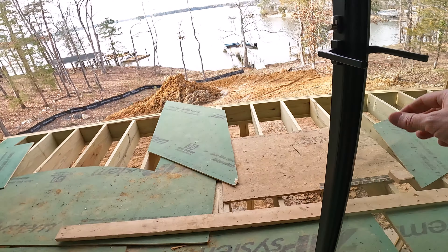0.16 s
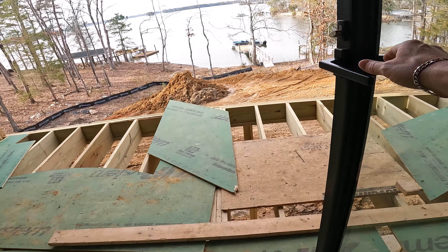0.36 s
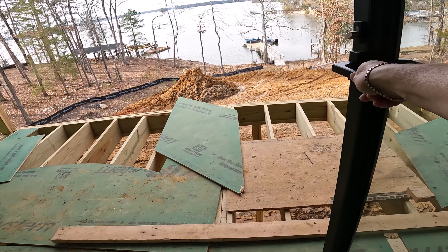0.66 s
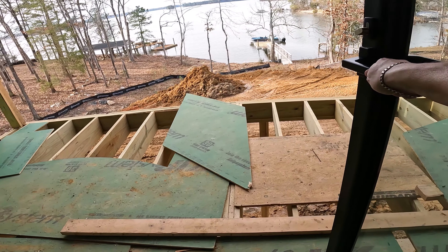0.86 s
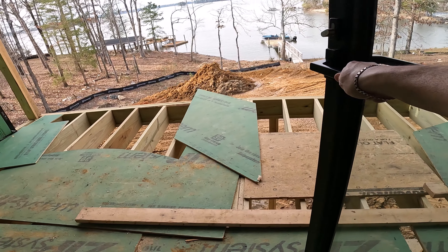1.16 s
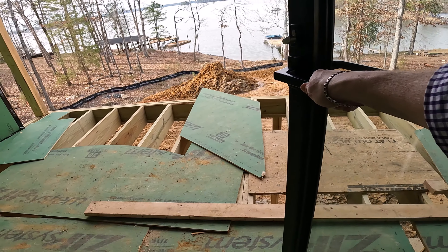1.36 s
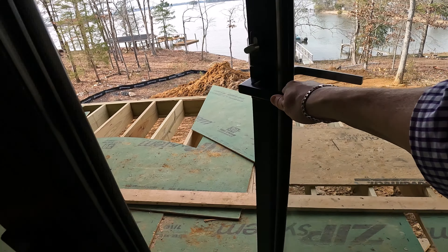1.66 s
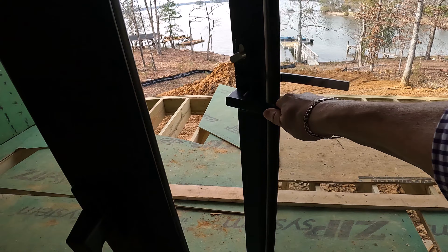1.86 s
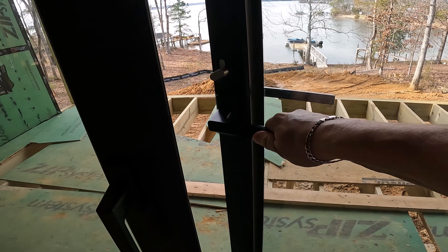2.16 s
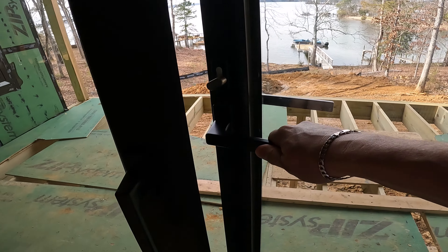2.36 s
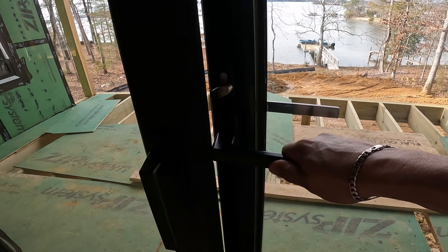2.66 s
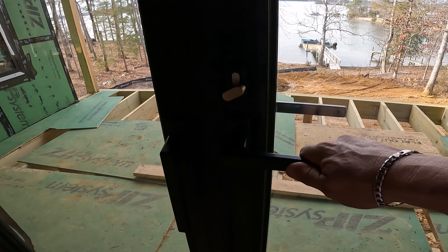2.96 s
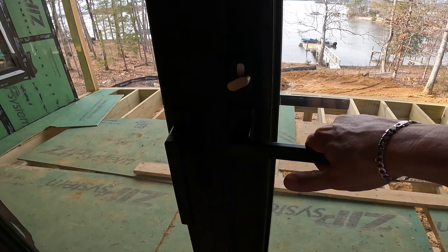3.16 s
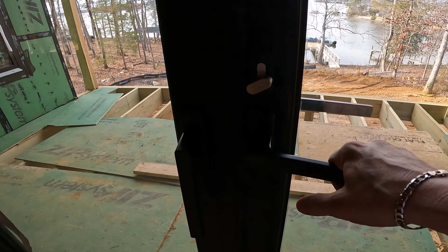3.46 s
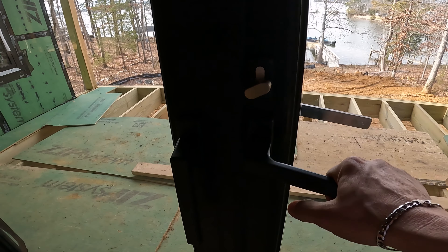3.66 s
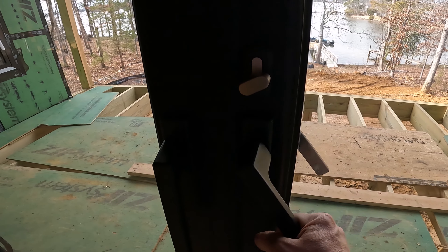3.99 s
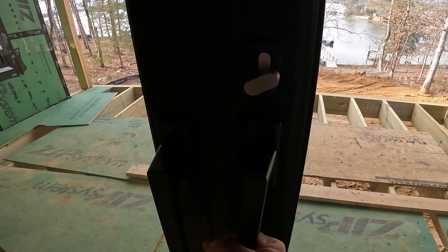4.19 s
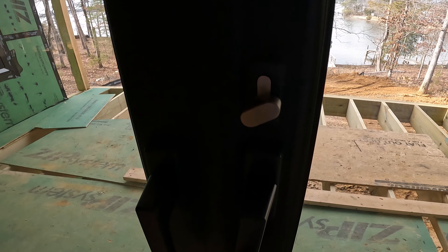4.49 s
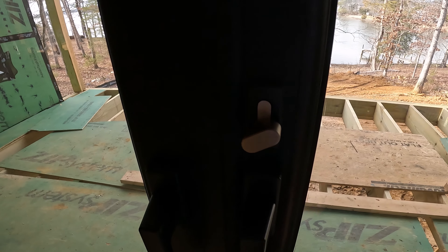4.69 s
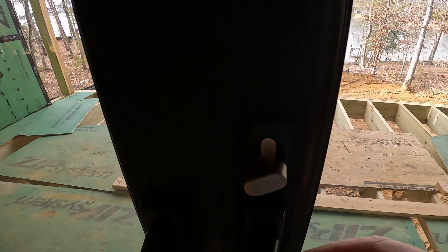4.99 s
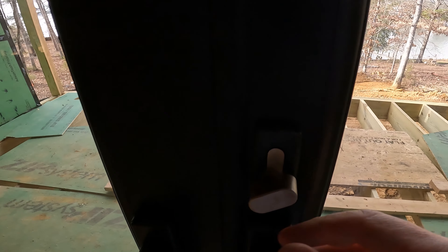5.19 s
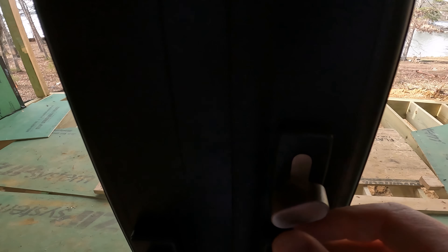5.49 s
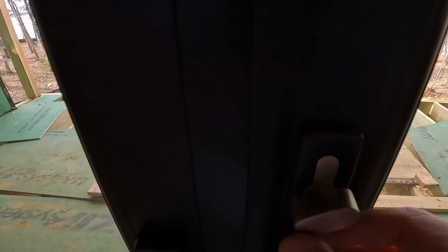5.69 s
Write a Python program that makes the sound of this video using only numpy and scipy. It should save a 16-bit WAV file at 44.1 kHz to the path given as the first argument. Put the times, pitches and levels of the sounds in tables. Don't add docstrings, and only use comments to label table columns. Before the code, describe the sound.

Close view of a door's metal lever and bolt in an unfinished timber building. A soft thump and small ticks sit over a distant engine drone; a latch clacks and slides, the engine fades, then a dense burst of metal blows and panel thuds erupts around three seconds. Groans, a bright spring snap and settling ticks follow over a low hum. Close stereo microphone, short woody reverberation, wind rumble.

```python
import sys
import numpy as np
from scipy import signal
from scipy.io import wavfile
from scipy.ndimage import uniform_filter1d

SR = 44100
rng = np.random.default_rng(int(sys.argv[2]) if len(sys.argv) > 2 else 0)


def unload_audio(sound):
    columns = np.transpose(np.atleast_2d(sound))
    steps = np.round(np.clip(columns, -1, 1) * 32767)
    wavfile.write(sys.argv[1], SR, steps.astype(np.int16))


def undo_db(level):
    steps = np.asarray(level, float) / 20
    return 10 ** steps


N = 257544
T = np.arange(N) / SR


def evened(x):
    return x / np.sqrt(np.mean(x ** 2) + 1e-20)


def curve(rows, t=T):
    s, *columns = np.transpose(rows)
    return [np.interp(t, s, c) for c in columns]


def read(points, hz, column=1):
    table = np.transpose(points)
    return np.interp(np.log(hz + 1), np.log(table[0] + 1), table[column])


def add(mix, s, sound):
    part = mix[..., round(s * SR):][..., :sound.shape[-1]]
    part += sound[..., :part.shape[-1]]


def resonate(x, hz, width):
    r = np.exp(-np.pi * width / SR)
    if np.ndim(hz) == 0:
        return 2 * signal.lfilter([1 - r], [1, -r * np.exp(2j * np.pi * hz / SR)], x).real
    turn = np.exp(2j * np.pi * np.cumsum(hz) / SR)
    return 2 * (turn * signal.lfilter([1 - r], [1, -r], x / turn)).real


def through(x, modes):
    out = 0
    for k, (hz, width, db) in enumerate(modes):
        mode = resonate(resonate(x, hz, width), hz, width) / np.sqrt(width)
        out = out + (-1) ** k * undo_db(db) * mode
    return out


def band(x, lo_hz, hi_hz):
    return signal.sosfilt(signal.butter(2, [lo_hz, hi_hz], "band", fs=SR, output="sos"), x)


def panned(x, pan_db):
    return x * undo_db([[pan_db / 2], [-pan_db / 2]])


# (frequency [Hz], level [dB], t60 [s])
LOCK_MODES = [(1790, -31, 0.12), (2770, -2.5, 0.38), (3540, -12, 0.14), (4170, -2, 0.25), (6640, -14, 0.14)]
# (frequency [Hz], width [Hz], level [dB])
METAL_TREBLE = [(4800, 6500, 2.5), (7000, 5940, 3), (11000, 3850, -8)]


def strikes(table, usual_t60, pan_db):
    usual_db, rattle_per_db = -31, 0.5043
    crack_share, ring_outlasts = 0.54, 1.8
    out, t = np.zeros((2, N)), np.arange(6000) / SR
    for s, db, hz, treble_db in table:
        t60 = usual_t60 * undo_db(rattle_per_db * (db - usual_db))
        bounces = undo_db(1.9 * rng.standard_normal((2, len(t) // 50))).repeat(50, axis=1)
        blow = 1.85 * undo_db(-60 * t / 0.0089)
        fade_s = np.maximum(t60 * np.array([[1], [crack_share]]), .004)
        rattle = (blow + bounces * undo_db(-60 * t / fade_s)) * np.minimum(t / 0.0011, 1)
        grain = rng.standard_normal((2, len(t))) * rattle
        centre = through(grain[0], [(0.557 * hz, 0.23 * hz, -9),
                                    (hz, 0.41 * hz, 0),
                                    (1.81 * hz, 1.86 * hz, -6.0 + 0.31 * treble_db)])
        crack = through(grain[1], METAL_TREBLE)
        ring = 0
        for mode_hz, mode_db, mode_t60 in LOCK_MODES:
            if mode_hz > 3600:
                mode_db = mode_db + treble_db
            else:
                mode_db = mode_db - 2.8 * abs(np.log2(mode_hz / hz))
            fade = undo_db(mode_db - 60 * t / min(mode_t60, ring_outlasts * t60))
            ring = ring + fade * np.sin(2 * np.pi * (0.9 * mode_hz * t + 0.1))
        hit = centre / abs(centre).max() + undo_db(1.28 * treble_db) * crack / abs(crack).max()
        hit = hit + undo_db(-24.0) * ring
        add(out, s - .0004, panned(undo_db(db - 3.0) * hit, pan_db))
    return out


# (time [s], peak level [dB], centre [Hz], relative treble above 4 kHz [dB])
CASE_STRIKES = [(.156, -39, 700, -8), (.189, -39, 1140, 1), (1.678, -20.5, 1840, -3),
                (1.770, -22.5, 2540, -2), (2.741, -37, 1160, -29), (2.941, -28.5, 1540, -12),
                (2.965, -29, 1520, -12), (2.994, -18.5, 980, -6.5), (3.026, -19.5, 1310, -13.5),
                (3.048, -13.5, 1446, 4.5), (3.121, -14.5, 960, -8.5), (3.155, -13, 1750, 5),
                (3.363, -21.5, 1500, -20.5), (3.3958, -14, 1530, 2), (3.409, -22.5, 1510, -16.5),
                (3.578, -35, 1270, -18), (3.613, -26, 1480, -17), (3.669, -25, 1400, -27),
                (3.68, -29, 1230, -14), (3.72, -32, 990, -1.5), (3.8, -36, 1390, -10),
                (3.877, -36, 1720, -6), (4.24, -27.5, 2650, 5.5)]
# (time [s], peak level [dB], centre [Hz], relative treble [dB])
EDGE_STRIKES = [(1.051, -49, 1160, -7), (1.732, -14, 2170, -1.5), (2.729, -28.5, 1730, -21.5),
                (2.891, -19.5, 1470, -13.5), (2.9825, -16.5, 2270, -7), (3.527, -21.5, 2060, -14.5),
                (3.781, -33, 1070, -6), (3.851, -37, 2380, -2.5), (3.924, -37, 1160, -8),
                (4.012, -35.5, 890, -18), (4.15, -38.5, 2610, 5), (4.177, -28, 2000, -18.5),
                (4.268, -22, 3770, -5.5), (4.283, -28, 1450, -16.5), (4.309, -31, 1320, -40)]


def lock_and_bolt():
    return strikes(CASE_STRIKES, 0.038, 1) + strikes(EDGE_STRIKES, 0.019, -1.5)


# (time [s], peak level [dB], frequency [Hz],
# t60 [s])
MODE_RINGS = [(2.9828, -11.5, 2250, 0.0061), (3.0, -40, 434, .05), (3.028, -23, 934, 0.054),
              (3.027, -22.5, 400, 0.035), (3.035, -31, 900, 0.057), (3.048, -23, 1563, 0.075),
              (3.049, -22, 1020, 0.04), (3.068, -25, 1110, 0.044), (3.076, -26, 940, 0.055),
              (3.093, -35, 1000, .05), (3.12, -31.5, 962, 0.15), (3.12, -25, 505, 0.094),
              (3.156, -25.5, 1870, 0.045), (3.159, -46, 2770, 0.14), (3.174, -28, 1500, .03),
              (3.184, -31, 986, .07), (3.21, -42, 1090, 0.09), (3.246, -30.5, 640, 0.09),
              (3.259, -39, 1020, 0.032), (3.526, -32.5, 1366, 0.034), (3.578, -37.5, 456, 0.044),
              (3.612, -33, 1380, 0.037), (3.622, -32.5, 2060, 0.024), (3.628, -45, 1500, 0.021),
              (3.676, -34, 2120, 0.035), (3.68, -42, 6600, .006), (3.69, -38, 900, 0.052),
              (3.746, -45, 1740, 0.045), (1.678, -29, 3700, .012), (3.791, -41, 1130, 0.025),
              (3.858, -45, 1320, 0.048), (3.891, -43.5, 1000, 0.04), (4.598, -56, 2000, 0.035),
              (4.622, -53, 1510, .04), (4.642, -46, 2280, 0.047), (4.684, -47, 1350, 0.035),
              (4.74, -41, 3140, 0.022), (4.758, -44, 3300, 0.028), (4.789, -48, 2830, 0.027),
              (4.825, -51, 3330, 0.026),
              (.0665, -22, 245, 0.025), (.072, -34, 100, 0.39), (0.17, -43, 1330, 0.024),
               (.189, -39, 1250, 0.024), (0.22, -48, 1150, 0.021), (3.0, -24, 180, 0.12),
               (3.068, -29, 332, 0.13), (3.102, -25, 250, 0.07), (3.127, -37, 740, .04),
               (3.155, -27, 808, 0.061), (3.157, -33, 625, .05), (3.15, -24.5, 320, .06),
               (3.185, -30, 325, 0.053), (3.156, -20, 7000, 0.018), (3.18, -37, 4980, 0.067),
               (3.207, -37, 7200, .04), (3.36, -40, 1050, 0.031), (3.397, -25, 7100, 0.018),
               (3.41, -35, 3420, 0.092), (4.2395, -28, 6600, 0.014), (4.24, -34, 6550, .03),
               (4.284, -26, 233, 0.063), (4.308, -35, 333, 0.05), (1.731, -19, 1880, 0.023),
               (1.771, -26, 2170, 0.022), (3.672, -35, 526, .06), (3.8, -37, 457, 0.062),
               (4.24, -26, 12000, 0.015), (4.267, -27, 3920, 0.0088), (4.918, -27.5, 200, 0.038),
               (4.92, -41, 618, 0.087), (5.4, -45.5, 550, 0.099)]


def rings():
    out, t = np.zeros(N), np.arange(9000) / SR
    for s, db, hz, t60 in MODE_RINGS:
        rise = np.minimum(t / (.0002 + 0.37 / hz), 1)
        add(out, s, undo_db(db - 60 * t / t60) * rise * np.sin(2 * np.pi * hz * t))
    return out


# (time [s], peak level [dB], main ring [Hz], relative upper body [dB])
PANEL_KNOCKS = [(0.066, -37, 181.6, -14), (0.075, -23, 66.7, -23), (.912, -36.5, 60, -9.5),
                (1.055, -38.5, 134.5, -8), (1.729, -25.5, 64.4, -6), (1.979, -29, 112.7, -11),
                (2.728, -36, 58.7, -37), (2.891, -41, 70, 4.5), (2.996, -25, 154, 3.5),
                (3.047, -26.5, 65.4, 1), (3.117, -15.5, 62, -9), (3.16, -16, 61.8, -6.5),
                (3.201, -34, 62.4, -1), (3.251, -21.5, 62, -14), (3.357, -31.5, 143.7, 0.5),
                (3.4, -21, 100, -3.5), (3.527, -28.5, 70, -11.5), (3.664, -32.5, 119, 4.5),
                (3.796, -31, 95, -1), (4.01, -17, 63.5, -23), (4.18, -28.5, 122, -49.5),
                (4.282, -17, 70, -11.5), (4.308, -23.5, 134.6, -18), (4.672, -22.5, 140, -22),
                (4.918, -39.5, 185, 0), (5.386, -33, 138.3, -11.5)]
# (frequency [Hz], width [Hz], level [dB])
PANEL_BODY = [(220, 160, 1), (337.4, 220, 10), (420, 510, 3.5), (640, 980, -31.5)]


def knocks():
    out, t = np.zeros(N), np.arange(14000) / SR
    for s, db, hz, body_db in PANEL_KNOCKS:
        t60 = 0.17 * (101 / hz) ** 0.069
        shake = undo_db(-60 * t / 0.026) + 0.2 * undo_db(-60 * t / 0.32)
        blow = rng.standard_normal(len(t)) * shake * np.minimum(t / 0.0044, 1)
        fade = undo_db(-60 * t / t60) * np.minimum(t / 0.0024, 1)
        turns = hz * (t + 0.0057 * (1 - np.exp(-t / 0.003)))
        low = fade * (np.sin(2 * np.pi * turns) + .5 * np.sin(2 * np.pi * 1.453 * turns))
        body = through(blow, PANEL_BODY)
        add(out, s, undo_db(db - 5.0) * (low + undo_db(body_db + 3.5) * body / abs(body).max()))
    return out


# (start time [s], length [s], top level [dB], centre [Hz], relative treble [dB])
LOADING_RUBS = [
    (2.8, 0.2, -38, 1190, -19.5),
    (5.34, 0.0784, -40.5, 3170, -3.5),
]
# (start time [s], length [s], top level [dB], centre [Hz], relative treble [dB])
EVEN_RUBS = [
    (1.74, 0.14, -46.5, 2000, -4.5),
    (1.984, 0.062, -39, 2300, -1.5),
    (3.015, 0.061, -37.5, 943, -15),
    (3.4, 0.023, -39, 1490, -1.5),
    (4.92, 0.033, -38.5, 2450, -3.5),
    (5.365, 0.04, -56.5, 2740, 6.5),
]
# (start time [s], length [s], top level [dB], centre [Hz], relative treble [dB])
SETTLING_RUBS = [
    (1.885, 0.4, -52, 1820, -7),
    (3.09, 0.71, -40.5, 900, -10),
    (3.62, 0.87, -52, 1350, -52),
    (4.27, 0.086, -38, 1260, -6),
    (4.96, 0.47, -56, 2090, -4.5),
    (5.43, 0.22, -54.5, 2480, -6.5),
]
# (start time [s], length [s], top level [dB], centre [Hz], relative treble [dB])
BRUSHES = [
    (.13, 0.076, -59, 1160, 2),
    (.0, 0.8, -65, 1600, -8),
    (2.735, .13, -65, 1500, -12),
    (1.48, 0.31, -66.5, 1740, 0.5),
    (4.57, 0.22, -61, 2270, -0.5),
    (4.69, 0.18, -51, 3030, -1),
    (5.13, .12, -58, 1980, 1.5),
]
# (factor on centre [ratio], width factor [ratio], level [dB])
RUB_MODES = [(0.447, 0.87, -6), (1.002, 0.93, 1), (1.65, 0.6, -4)]
# (frequency [Hz], width [Hz], level [dB])
DOOR_MODES = [(426.4, 48, 10.5), (545, 40, 0.5), (662.4, 59, 4), (935, 70, 4), (1043, 70, 0.5),
              (1256, 130, 0), (1540, 190, -2.5), (1933, 120, -5), (2300, 300, -4)]


def rubs():
    touch_s, stop_s, speed_up = 0.0088, 0.01, 0.21
    unevenness_db = 2.3 * np.minimum(rng.exponential(1, (4, N // 90 + 1)), 5)
    slips = rng.standard_normal((4, N)) * undo_db(unevenness_db).repeat(90, axis=1)[:, :N]
    treble = evened(through(slips[3], METAL_TREBLE))
    bumps = rng.random((len(DOOR_MODES), N)) < 110 / SR
    bumps = bumps * undo_db(5.1 * np.clip(rng.standard_normal(N), -2, 2))
    door = np.array([through(bump, [mode]) for bump, mode in zip(bumps, DOOR_MODES)])
    out = np.zeros(N)
    # strokes, change of pressure over a stroke [dB], fade in and out [dB]
    kinds = [(LOADING_RUBS, 36, 0), (EVEN_RUBS, -0.5, 0), (SETTLING_RUBS, -25, 0), (BRUSHES, 0, 20.5)]
    strokes = [(*row, change_db, arch_db) for table, change_db, arch_db in kinds for row in table]
    for s, length, top_db, centre_hz, treble_db, change_db, arch_db in strokes:
        a, b = round(s * SR), round((s + length + stop_s) * SR)
        t = T[a:b]
        along = (t - s) / length
        loading = change_db > 0
        db = top_db + change_db * (along - loading) - arch_db * (2 * along - 1) ** 2
        hz = centre_hz * (1 + speed_up * (along - .5) * loading)
        body = 0
        for slip, (factor, width, mode_db) in zip(slips, RUB_MODES):
            body = body + through(slip[a:b], [(factor * hz, width * hz.mean(), mode_db)])
        near = undo_db(-9 * abs(np.log2(np.transpose(DOOR_MODES)[0] / hz.mean())))
        clatter = near @ door
        clatter = clatter[a:b] / np.std(clatter)
        knock = np.clip(-treble_db / 22, .1, .8)
        stroke = np.sqrt(1 - knock) * evened(body) + np.sqrt(knock) * clatter
        stroke = stroke + undo_db(treble_db) * treble[a:b]
        edges = np.minimum((t - t[0]) / touch_s, (T[b] - t) / stop_s)
        out[a:b] += undo_db(db) * stroke * np.minimum(1, edges)
    return out


# (time [s], frequency [Hz],
# level [dB])
SLIDING_TONES = [
    (700, [(.41, 3600, -77), (.455, 3280, -66), (.5, 2740, -64), (.545, 2600, -65.5), (.59, 2140, -70), (.69, 2290, -85)]),
    (70, [(3.7, 300, -69), (3.8, 272, -51.5), (3.92, 252, -80), (4.02, 234, -40.5), (4.1, 315, -50.5), (4.22, 313, -64), (4.27, 324, -34)]),
                 (500, [(1.984, 2594, -45), (2.0, 2330, -45.5), (2.022, 2300, -60), (2.033, 3000, -36.5), (2.045, 3040, -51)]),
    (900, [(4.6, 2880, -76), (4.645, 3050, -59), (4.665, 3100, -65)]),
    (1800, [(4.83, 1500, -65), (4.91, 1500, -64)]),
    (505, [(4.59, 2000, -61), (4.63, 2320, -68), (4.648, 2360, -48), (4.668, 2300, -67)]),
    (350, [(4.615, 1490, -65), (4.64, 1360, -57), (4.66, 1250, -57), (4.68, 1190, -56)]),
    (300, [(4.72, 800, -71), (4.755, 900, -52), (4.79, 820, -72), (4.84, 870, -61)]),
    (500, [(1.78, 2000, -42), (1.84, 1900, -53.5), (1.88, 2340, -47), (1.9, 2000, -70)]),
    (200, [(.41, 3520, -72.5), (.455, 3430, -74), (.485, 2780, -67), (.512, 2420, -74)]),
    (160, [(.585, 2120, -72), (.61, 2140, -71), (.65, 2280, -73), (.68, 2320, -77)]),
]


def squeaks():
    out = np.zeros(N)
    for width, rows in SLIDING_TONES:
        t = np.arange(rows[0][0], rows[-1][0], 1 / SR)
        hz, db = curve(rows, t)
        tone = evened(through(rng.standard_normal(len(t)), [(hz, width, 0)]))
        add(out, t[0], undo_db(db) * tone)
    return out


def ticks(table, t60, spread, pan_db):
    out, t = np.zeros(N), np.arange(2500) / SR
    for s, db, hz in table:
        burst = rng.standard_normal(len(t)) * undo_db(-60 * t / t60)
        tick = through(burst, [(hz, spread * hz, 0), (0.37 * hz, spread * hz, -12)])
        add(out, s, undo_db(db) * tick / abs(tick).max())
    return panned(out, pan_db)


# (time [s], peak level [dB], ring [Hz])
LEVER_TICKS = [(.066, -50, 950), (.104, -48.5, 3630), (.884, -53, 2300), (.912, -52.5, 2300),
               (.95, -53, 2140), (1.151, -45.5, 2230), (1.211, -52.5, 2290), (1.262, -49.5, 2260),
               (1.408, -57, 2400), (2.031, -32, 2980), (2.155, -49.5, 1380), (3.25, -31, 1100),
               (2.5, -66, 3020), (2.869, -50, 2730), (3.965, -47.5, 2633), (4.101, -51.5, 2530),
               (4.136, -46, 2800), (4.368, -43.5, 2450), (4.493, -55, 2597), (4.567, -50, 2960),
               (4.615, -50.5, 3130), (4.643, -54.5, 2600), (4.657, -51.5, 2920), (4.682, -42, 1345),
               (4.713, -42, 3240)]


def lever_creaks():
    return ticks(LEVER_TICKS, 0.048, 0.66, -2.0)


# (time [s], peak level [dB], ring [Hz])
SPRING_PINGS = [(1.05, -46.5, 4800), (1.569, -60, 5200), (1.951, -50, 5740), (2.036, -24, 4440),
                (2.941, -34, 6500), (2.996, -36, 6640), (3.033, -24, 6100), (3.625, -38, 7000),
                (3.737, -54, 7450), (3.748, -50, 7270), (3.758, -48, 7100), (3.77, -54, 7200),
                (3.782, -56, 7000), (3.93, -46, 6200), (3.982, -61, 7000), (4.235, -24.5, 7300),
                (4.2396, -17, 6300), (4.663, -53, 4740), (5.051, -42, 4110), (5.484, -58, 6200)]
# (time [s], peak level [dB], ring [Hz])
SPRING_SNAPS = [
    (4.235, -33.5, 11000),
    (4.2396, -16.5, 10900),
    (4.2678, -16.5, 10060),
]


def springs():
    return ticks(SPRING_PINGS, 0.0054, 0.27, -0.46) + ticks(SPRING_SNAPS, 0.017, 0.54, 3.4)


# (time [s], peak level [dB], centre [Hz])
GRIT_FLICKS = [(2.869, -47.5, 6360), (3.844, -42.5, 4470), (3.874, -51, 5920), (3.89, -47, 5000),
               (3.943, -59, 6500), (3.965, -45.5, 5550), (4.007, -46, 4970), (4.033, -58.5, 4520),
               (4.066, -56, 9000), (4.101, -49, 7000), (4.136, -45, 7000), (4.157, -40, 6000),
               (3.372, -37, 5000), (3.411, -37.5, 7000), (3.178, -43, 6000), (3.446, -51, 6000),
               (4.662, -50, 4500), (4.757, -50.5, 8500), (4.786, -53, 7500), (4.826, -53, 6500)]


def grit():
    return ticks(GRIT_FLICKS, 0.0077, 0.77, 1.5)


# (time [s], peak level [dB], centre [Hz])
LONE_SPECKS = [(.02, -62, 3200), (.172, -46, 5500), (.365, -55, 4500), (2.153, -56, 6073),
               (2.615, -59.5, 9065), (2.723, -45, 5500), (3.599, -58, 9000), (1.215, -56, 7000),
               (3.736, -50, 8000), (3.748, -46, 5500), (3.758, -48, 8000), (3.771, -48, 8000),
               (1.953, -46, 5500)]


def specks():
    return ticks(LONE_SPECKS, 0.0055, 0.91, 0.5)


def leaf(x):
    late = np.roll(x, round(.0006 * SR))
    echo = undo_db(-9) * band(late, 900, 16000) + undo_db(-11.5) * band(late, 10500, 16000)
    return np.array([echo, -echo])


# (frequency [Hz], t60 [s], level [dB])
TIMBER_ROOM = [(100, 0.91, 0), (500, 0.23, 5.5), (2000, 0.43, 1.5), (4010, 0.43, 0), (7600, 0.51, -5),
               (12000, 0.32, 0)]


def room(x):
    taps = np.zeros((3, SR))
    at = np.arange(500, SR - 20, 20) + rng.integers(0, 20, (3, (SR - 501) // 20))
    np.put_along_axis(taps, at, rng.choice([-1., 1.], at.shape), 1)
    hz, t, z = signal.stft(taps, SR, nperseg=256)
    apart = np.clip(0.2 + hz / 6000, 0, 1.4)[:, None]
    t60 = read(TIMBER_ROOM, hz)[:, None]
    db = read(TIMBER_ROOM, hz, column=2)[:, None]
    z = (z[0] + apart * z[1:]) * undo_db(db - 60 * t / t60)
    tail = signal.istft(z, SR, nperseg=256)[1]
    return signal.fftconvolve(x[None], tail / np.linalg.norm(tail[0]), axes=1)[:, :N]


# (time [s], level [dB])
GUSTS = [(0, -49), (1.45, -53), (1.65, -43), (2.2, -46), (2.89, -59), (3.03, -26), (3.25, -29.5),
         (3.38, -35), (3.74, -47.5), (3.9, -34.5), (4.3, -40), (4.6, -43.5), (5.84, -48.5)]


def buffet():
    db = curve(GUSTS)[0]
    noise = rng.standard_normal((4, N))
    push = np.array([evened(band(band(v, 2.17, 12.9), 7.38, 24)) for v in noise[:2]])
    flutter = np.array([evened(band(band(v, 5.4, 31.4), 32.4, 180)) for v in noise[2:]])
    slow, slow_side = undo_db(-37 + 0.18 * (db - db.mean())) * push
    quick, quick_side = undo_db(db + 1.55) * flutter
    side = undo_db(-13.0) * slow_side + undo_db(-39.5) * quick_side
    return panned(slow, -4.5) + quick + np.array([side, -side])


def waver():
    drift = evened(uniform_filter1d(rng.standard_normal(N // 400 + 1), 8))
    return uniform_filter1d(undo_db(1.7 * drift.repeat(400)[:N]), 800)


# (time [s], level [dB])
ENGINE_LEVEL = [(0, -52.5), (.6, -50), (1.5, -52), (2.2, -55.5), (2.6, -72.5), (3.2, -69.5)]
# (time [s], level [dB])
ENGINE_LOAD = [(.2, -8), (.5, -1), (1.45, 2.5), (1.7, -20)]
# (multiple of rotation [ratio], level [dB])
ENGINE_ORDERS = [(1.75, -28.5), (3, 1), (3.55, -37.5), (5, -31), (6, -10), (9, -31)]


def engine():
    turn_hz = 52.3
    level_db, load_db = curve(ENGINE_LEVEL)[0], curve(ENGINE_LOAD)[0]
    orders = 0
    for k, db in ENGINE_ORDERS:
        tone = np.sin(2 * np.pi * (k * turn_hz * T + rng.random()))
        orders = orders + undo_db(db + (k > 5.5) * load_db) * waver() * tone
    wash = evened(band(band(rng.standard_normal(N), 250, 500), 250, 500))
    return undo_db(level_db) * (np.sqrt(2) * orders + undo_db(-13) * wash)


# (time [s], frequency [Hz], level [dB])
MACHINE_HUM = [(0, 142.1, -57.5), (2, 139, -57.5), (2.8, 141.7, -54.5), (4.3, 137, -50),
               (5.2, 139.2, -47.5), (5.84, 140.3, -49.5)]


def hum():
    hz, db = curve(MACHINE_HUM)
    return np.sqrt(2) * undo_db(db) * waver() * np.sin(2 * np.pi * np.cumsum(hz) / SR)


# (frequency [Hz], level per Hz [dB])
AIR_COLOUR = [(70, -14), (120, 0.5), (165, -3), (210, -9.5), (260, -6.5), (330, -17), (420, -18),
              (520, -28), (760, -33.5), (1300, -26.5), (2200, -35.5), (4000, -40), (5800, -37),
              (16000, -51.5)]
# (time [s], level [dB])
AIR_LEVEL = [(0, 10.5), (.6, 8.5), (1.4, 7), (2.3, 7), (2.6, 3), (3.5, 13), (4.5, 7.5), (5.3, 6), (5.84, 5)]
# (frequency [Hz], left-right likeness [ratio])
PORT_LIKENESS = [(60, 0.66), (180, 1), (400, 0.4), (800, 0.13), (1650, 0.11), (5000, 0.56), (15000, 0.43)]


def air():
    frames, hz = N // 256 + 5, np.fft.rfftfreq(1024, 1 / SR)
    a, b, c, d, patches = rng.standard_normal((frames, 513, 5)).T
    patches = evened(uniform_filter1d(uniform_filter1d(patches, 14, 0), 16, 1))
    same = np.clip(read(PORT_LIKENESS, hz), -1, 1)[:, None]
    left, other = a + 1j * b, c + 1j * d
    z = np.array([left, same * left + np.sqrt(1 - same ** 2) * other])
    z *= undo_db(read(AIR_COLOUR, hz)[:, None] + (1.5 + hz[:, None] / 16000) * patches)
    x = signal.istft(z, nperseg=1024, noverlap=768)[1][:, :N]
    return undo_db(-63.5 + curve(AIR_LEVEL)[0]) * x / np.std(band(x[0], 185, 16000))


def scene():
    metal = lock_and_bolt() + lever_creaks()
    small = springs() + grit()
    modes, wood = rings(), knocks()
    rub = rubs() + squeaks()
    sent = undo_db(-15.5) * modes + undo_db(-10.0) * metal.mean(0) + undo_db(-18) * small.mean(0)
    sent = sent + undo_db(-5.0) * wood + undo_db(-9.5) * rub
    door = metal + panned(modes, .6) + small + wood + panned(rub, .3) + specks()
    echo = leaf((metal + small).mean(0) + modes + rub)
    background = buffet() + engine() + hum() + air()
    return door + echo + room(sent) + background


def roll_off(x):
    return signal.sosfilt(signal.butter(12, 16490, fs=SR, output="sos"), x)


# (frequency [Hz], level [dB])
MIC_COLOUR = [(20, 1), (7400, -2), (8200, -6.5), (12500, -5), (14000, -9), (16000, -18.5)]


def record(dry):
    hz = np.linspace(0, SR / 2, 257)
    edges = np.sin(np.pi / 2 * np.minimum(np.minimum(T, T[-1] - T) / .005, 1)) ** 2
    colour = signal.firwin2(511, hz, undo_db(read(MIC_COLOUR, hz)), fs=SR)
    mix = signal.oaconvolve(edges * dry, colour[None], "same")
    return roll_off(mix)


dry = scene()
out = record(dry)
unload_audio(out)
```